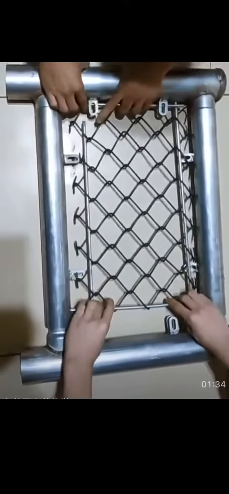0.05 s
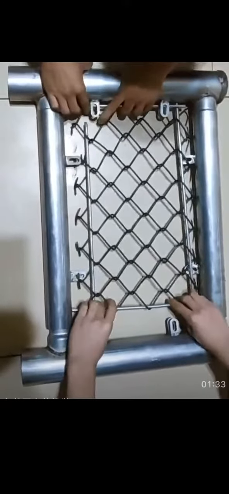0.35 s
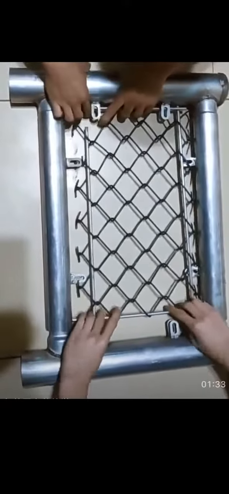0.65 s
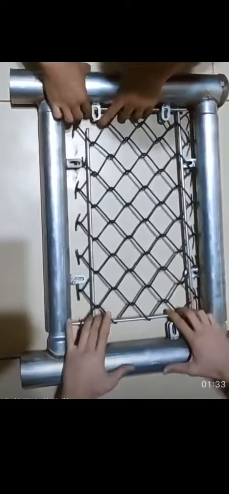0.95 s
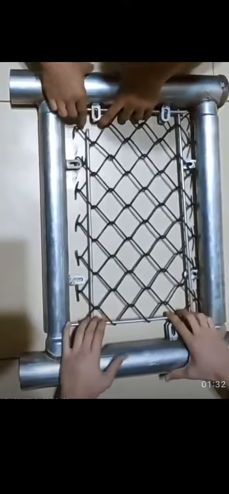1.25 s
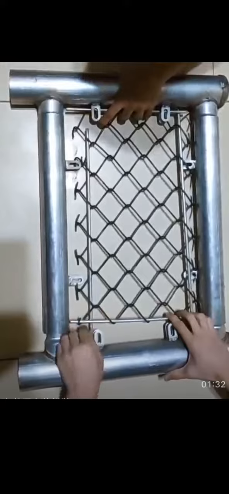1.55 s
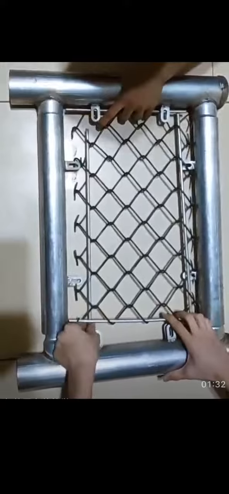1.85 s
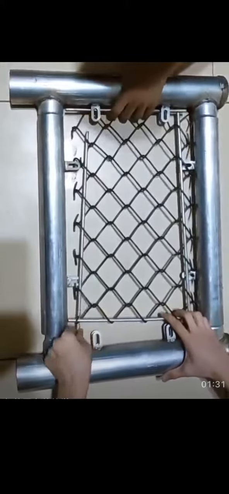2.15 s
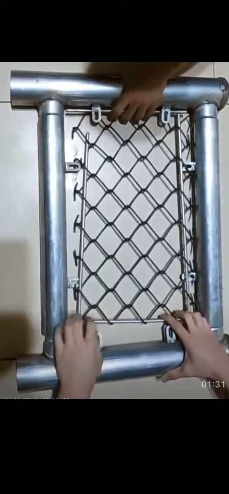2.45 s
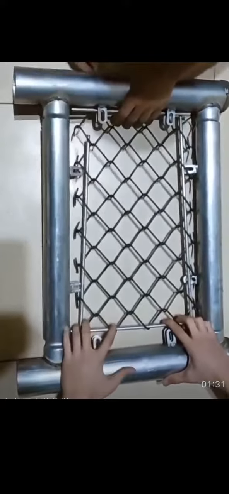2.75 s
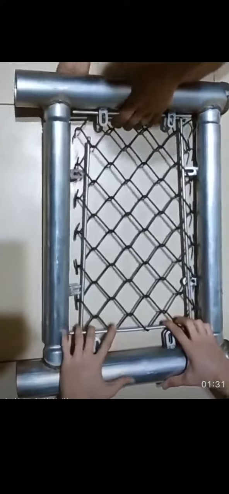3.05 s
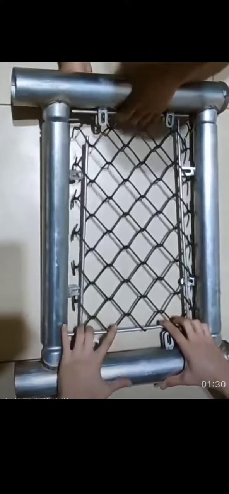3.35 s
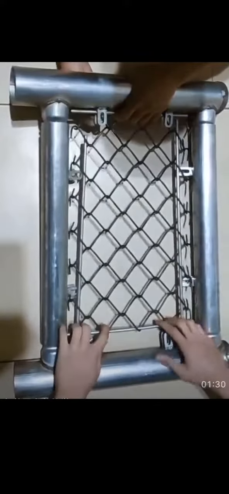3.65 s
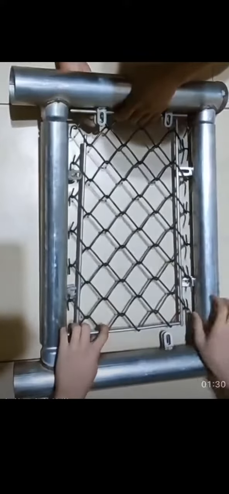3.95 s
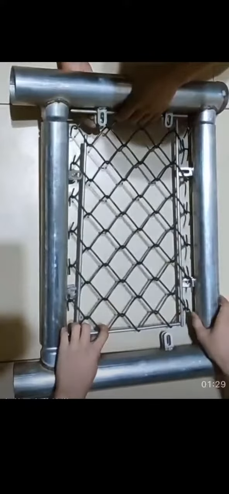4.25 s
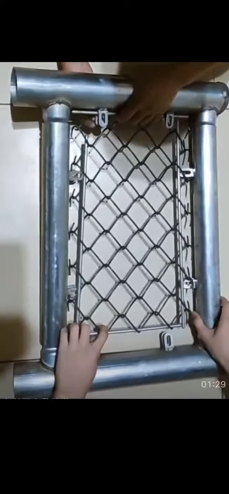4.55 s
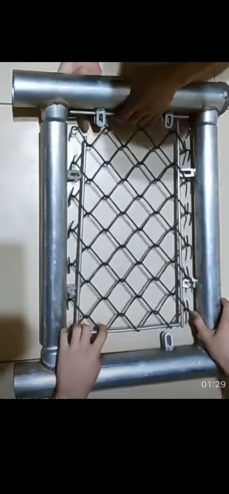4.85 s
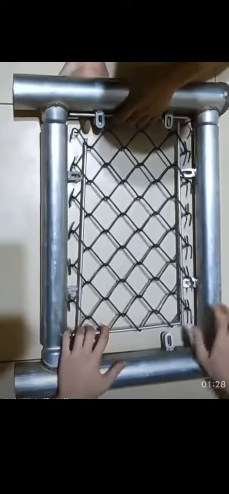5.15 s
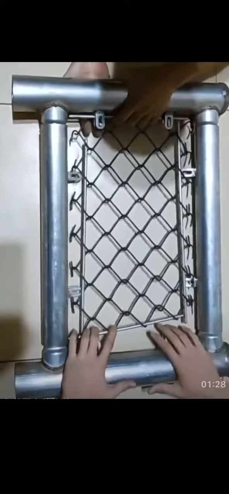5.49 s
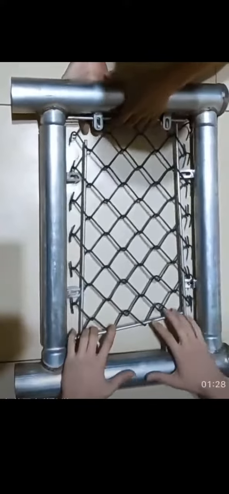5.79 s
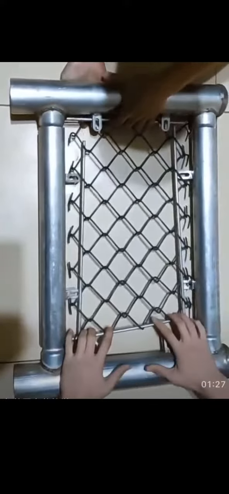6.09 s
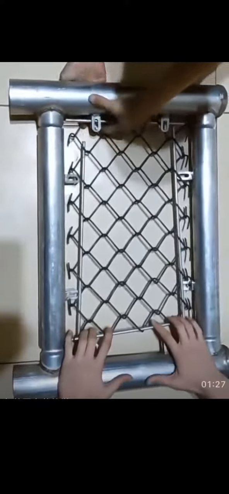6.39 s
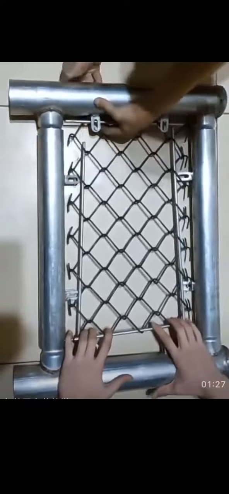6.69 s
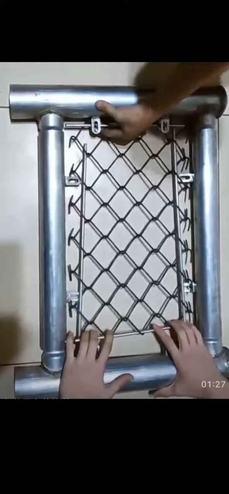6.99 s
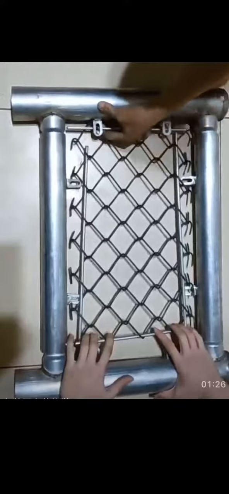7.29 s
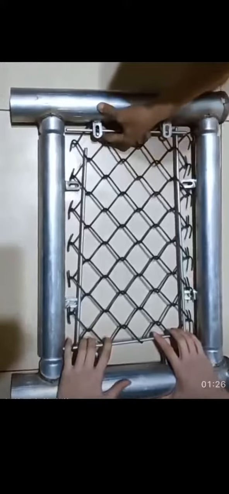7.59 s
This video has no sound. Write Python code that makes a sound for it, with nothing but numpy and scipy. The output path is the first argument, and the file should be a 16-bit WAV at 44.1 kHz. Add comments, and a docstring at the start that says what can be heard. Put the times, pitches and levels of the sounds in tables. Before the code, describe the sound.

Chain-link mesh rustles against a steel pipe frame, with irregular metallic clinks, a sharp snap and a ringing bump in a small room.

```python
"""A small hard room with a tiled floor; one microphone, close to a welded frame of steel pipe.
Over a low hush, hands settle a panel of chain-link mesh into the frame: wire rustles, clamps chatter.
At 2 s a rod squeaks in its clamps, then knocks and, at 3.5 s, slides. From 5 s the mesh is pulled taut
until a bar snaps against the pipe. Near 7 s the mesh drags, and the whole frame bumps the floor,
rings and comes to rest. Tiles and walls answer every knock."""
import sys
import numpy as np
from scipy import signal
from scipy.fft import rfft, irfft
from scipy.io import wavfile
from scipy.ndimage import uniform_filter1d

SR = 44100
rng = np.random.default_rng(int(sys.argv[2]) if len(sys.argv) > 2 else 0)


def transcribe(signal):
    """Save signal, clipped to [-1, 1], as a 16-bit WAV file at the path in sys.argv[1]."""
    frames = np.atleast_2d(signal).T
    limited = np.clip(frames, -1, 1)
    pcm = np.round(limited * 32767).astype(np.int16)
    wavfile.write(sys.argv[1], SR, pcm)


N = 345303


def amp(db):
    """Decibels to gain."""
    return 10 ** (np.asarray(db) / 20)


def unit(x):
    """Scale to rms 1."""
    return x / np.sqrt(np.mean(x ** 2) + 1e-20)


def read(points, hz):
    """Interpolate a table on a log-frequency axis."""
    f, value = np.transpose(points)
    return np.interp(np.log(hz + 1), np.log(f + 1), value)


def add(mix, start_s, sound):
    """Mix a sound in at its start time."""
    part = mix[max(round(start_s * SR), 0):][:len(sound)]
    part += sound[:len(part)]


def colour(x, *spectra, size=4096):
    """Causal filter with the summed dB of the spectra."""
    hz = abs(np.fft.fftfreq(size, 1 / SR))
    log_gain = np.log(amp(sum(read(s, hz) for s in spectra)))
    taps = np.fft.ifft(np.exp(np.conj(signal.hilbert(log_gain)))).real
    return signal.oaconvolve(x, taps[:size // 2])[:len(x)]


def level_out(x, count=16):
    """Flatten a burst's spectrum over broad bands, keeping its fine lines."""
    hz, power = np.fft.rfftfreq(len(x), 1 / SR), abs(rfft(x)) ** 2
    centres = np.geomspace(100, 13000, count)
    bands = [(f, -10 * np.log10(power[abs(hz - f) < 70 + f / 5].mean())) for f in centres]
    return colour(x, bands)


def grit(count, per_s, spread_db, smooth):
    """Micro-impacts of uneven size over a share of smooth friction."""
    size = amp(spread_db * np.minimum(rng.exponential(1, count), 4))
    hits = size * rng.choice([-1, 1], count) * (rng.random(count) < per_s / SR)
    return unit(unit(hits) + smooth * rng.standard_normal(count))


def strokes(rows, attack_s, release_s):
    """Gain of hand movements: each swells up to its listed time, holds and dies away."""
    t = np.arange(N) / SR
    gains = []
    for start, hold, db in rows:
        swell = np.minimum(t - start, 0) / attack_s
        fade = np.maximum(t - start - hold, 0) / release_s
        gains.append(amp(db) * np.exp(swell - fade))
    return np.max(gains, axis=0)


# Room tone all around the microphone: (frequency [Hz], relative level [dB])
HUSH_SPECTRUM = [(12, -20), (20, 3), (140, -19), (310, -16), (1890, -36.5), (2700, -34), (4190, -35),
                 (5510, -36.5), (5990, -36.5), (7250, -36), (14000, -52)]
def room_tone(hush_db=-65, hum_hz=101, hum_db=-79.5):
    """The steady low hush of the room with a faint mains hum."""
    spectrum = amp(read(HUSH_SPECTRUM, np.fft.rfftfreq(N, 1 / SR)))
    hush = irfft(rfft(rng.standard_normal(N)) * spectrum, N)
    hum = np.sin(2 * np.pi * hum_hz * np.arange(N) / SR)
    return amp(hush_db) * unit(hush) + amp(hum_db) * unit(hum)


# Decay of the small tiled room: (frequency [Hz], t60 [s])
ROOM_DECAY = [(120, 0.74), (400, 0.45), (1500, 0.37), (4000, 0.34), (8000, 0.31), (14000, 0.2)]
def reflections(x, wet_db=-9.0, build_s=0.0071):
    """Dense echoes reach the microphone from tiles and walls, each band dying at its own speed."""
    echoes = rng.choice([-1., 1.], SR) * (rng.random(SR) < 4000 / SR)
    hz, t, bands = signal.stft(echoes, SR, nperseg=256)
    decay = amp(-60 * t / read(ROOM_DECAY, hz)[:, None])
    tail = signal.istft(bands * decay, SR, nperseg=256)[1]
    tail *= 1 - np.exp(-(np.arange(len(tail)) / SR / build_s) ** 2)
    return amp(wet_db) * signal.fftconvolve(x, tail / np.linalg.norm(tail))[:N]


def ring_fittings(hits, ring_db=0, t60=0.071, uneven_db=3, count=110):
    """Hits plus the crowded, brief modes of clamps and wire, which differ with every spot touched."""
    t = np.arange(SR // 10) / SR
    detune, size, phase = rng.standard_normal((3, count, 1))
    hz = 12000 * ((np.arange(count)[:, None] + 2 + .4 * detune) / count) ** 1.4
    modes = amp(uneven_db * size) * hz ** (1 / 7) * np.sin(2 * np.pi * (hz * t + phase))
    ringing = modes.sum(0) * amp(-60 * t / t60)
    ringing /= np.linalg.norm(ringing)
    return hits + amp(ring_db) * signal.oaconvolve(hits, ringing)[:len(hits)]


# Colour of the steelwork, shared by rustle, drag and knocks: (frequency [Hz], level [dB])
STEEL_COLOUR = [(50, -21.5), (170, -3), (390, 0), (750, -3), (1250, -3.5), (1580, 5.5), (1800, -4.5),
                (2030, -6), (2400, -0.5), (2750, 1), (3800, -4), (4170, -5), (4500, -0.5), (5300, 0.5),
                (6000, -9.5), (7000, -3), (8500, -4), (9500, -18), (14000, -32)]
# Hands shift the mesh: (time [s], hold [s], relative level [dB])
MESH_SHIFTS = [(0, 0.3, -63.5), (.75, 0.86, -66), (2.03, 0.31, -60), (2.69, 0.74, -55.5), (3.4, 0.6, -59),
               (4.48, 0.031, -56.5), (4.99, 0.67, -57), (5.48, 0.42, -54), (6.8, 0.15, -52.5)]
def mesh_rustle(gain_db=-3, rest_db=-76, clump_db=1.5):
    """Wire links tick and rub against each other in clumps, each tick ringing briefly."""
    clumps = unit(uniform_filter1d(rng.standard_normal(N), size=1500))
    ticks = grit(N, per_s=400, spread_db=3, smooth=0.7) * amp(clump_db * clumps)
    wire_colour = [(150, 7.5), (400, -1.5), (1100, 1.5), (1600, 0), (3000, -1.5), (5000, -5),
                   (9000, -6.5)]
    wire = colour(ring_fittings(ticks), STEEL_COLOUR, wire_colour)
    movement = strokes(MESH_SHIFTS, attack_s=0.024, release_s=0.14)
    return (amp(rest_db) + amp(gain_db) * movement) * unit(wire)


# The mesh drags as the frame shifts: (time [s], hold [s], level [dB])
MESH_DRAGS = [(6.69, 0.27, -56.5)]
def mesh_drag():
    """Wire dragged over galvanised pipe hisses in fine, bright grains."""
    grains = grit(N, per_s=980, spread_db=-0.5, smooth=0.43)
    hiss = colour(grains, STEEL_COLOUR, [(1000, -1), (3000, -7), (5000, -1.5), (8000, 1), (13000, 5)])
    return strokes(MESH_DRAGS, attack_s=0.05, release_s=.015) * unit(hiss)


# Resonances of the sliding rod: (frequency [Hz], width [Hz], level [dB])
ROD_RESONANCES = [(1475, 80, -5), (1620, 30, 4.5), (1681, 21, 4), (3200, 900, -11.5), (3655, 43, -1),
                  (4790, 320, -3), (4980, 460, -4.5), (5280, 350, -2.5), (6900, 780, -11)]
# Pushes of the rod along the pipe: (time [s], hold [s], level [dB])
ROD_PUSHES = [(3.46, .008, -38.5), (3.51, 0.041, -40), (3.648, 0.034, -40), (3.72, 0.21, -58.5)]
def rod_slide():
    """Friction grains ring the rod's resonances."""
    hz = np.fft.rfftfreq(N, 1 / SR)
    body = sum(amp(db) / (1 + 2j * (hz - f) / width) ** 2 for f, width, db in ROD_RESONANCES)
    grains = ring_fittings(grit(N, per_s=700, spread_db=7.0, smooth=0.43))
    rubbed = unit(irfft(rfft(grains) * body, N))
    return strokes(ROD_PUSHES, attack_s=0.0041, release_s=0.017) * rubbed


# The rod catches in a clamp: (time [s], hold [s], level [dB])
ROD_CATCHES = [(2.051, 0.022, -41.5), (2.09, 0.041, -51), (2.132, 0.017, -44)]
# The rod slips free: (time [s], hold [s], level [dB])
ROD_SLIPS = [(2.08, 0.021, -36.5), (2.132, .012, -37.5), (2.207, 0.0089, -45.5)]
# Partials of its whistle: (frequency [Hz], relative level [dB])
WHISTLE_PARTIALS = [(8015, 5), (8160, -7), (10300, -13), (10810, -17)]
def rod_squeak(waver=0.00136):
    """The rod gives a dry rasp as it catches and a thin, beating whistle each time it slips."""
    whistle = 0
    for hz, db in WHISTLE_PARTIALS:
        drift = unit(uniform_filter1d(rng.standard_normal(N), size=300))
        whistle += amp(db) * np.sin(2 * np.pi * np.cumsum(hz * (1 + waver * drift)) / SR)
    rasp_colour = [(2000, -23), (6300, -10), (8000, 6.5), (9300, -9), (10800, -0.5), (11800, -28),
                   (14000, -13)]
    rasp = colour(grit(N, per_s=4400, spread_db=4, smooth=.9), rasp_colour)
    slipping = strokes(ROD_SLIPS, attack_s=0.0053, release_s=0.019)
    catching = strokes(ROD_CATCHES, attack_s=0.0009, release_s=.008)
    return slipping * unit(whistle) + catching * unit(rasp)


# Modes of the pipe frame lying on the tiles: (frequency [Hz], relative level [dB], t60 [s])
FRAME_MODES = [(194.7, -22.5, 0.22), (314.2, -22.5, 0.28), (391, -19, 0.51), (947, -21, 0.8),
               (1061.5, -15.5, 0.21), (1117, -15, 0.44), (1415, -9.5, 0.22), (1593, -12, .32),
               (1646, -6, 0.29), (1688, -13.5, 0.68), (2430, -15.5, 0.72), (2550, -15, 0.34),
               (2804, -15.5, 0.25), (2965, -15, 0.37), (3500, -23, 0.35), (3370, -23, 0.27),
               (3915, -22, 0.32), (4440, -15, 0.34), (5180, -22, 0.21)]
def frame_ring(force, blow, body_db, gain_db=-2.0, heavy_slope=0.43):
    """The frame gathers energy for as long as the chatter lasts, then rings on."""
    t = np.arange(len(force)) / SR
    modes = np.array([amp(-60 * t / t60) * np.sin(2 * np.pi * hz * t) for hz, _, t60 in FRAME_MODES])
    modes /= np.linalg.norm(modes, axis=1, keepdims=True)
    hz, mode_db, _ = np.transpose(FRAME_MODES)
    # light touches stay in the clamps; heavy blows reach the whole frame
    reach = amp(mode_db + read(blow, hz) + gain_db + heavy_slope * body_db)
    gathered = np.sqrt(np.cumsum(force ** 2) / np.sum(force ** 2))
    return gathered * (reach @ modes)


# Where a blow's thud, body, clank, sparkle and top lie: (frequency [Hz])
BLOW_BANDS = [400, 1300, 4000, 8000, 12000]
# The parts that get touched, by name: (note [Hz], extra thud [dB], extra sparkle [dB])
TOUCHED_PARTS = {"clamp": (2700, -1.1, -9.5), "wire": (4480, 9, -2.4), "rod tip": (5080, -2.7, -7),
                 "rod shaft": (1640, -20.5, -9.5), "clip": (8100, -2, 0.92), "bar": (3375, 0, -3),
                 "pipe": (1500, 0.5, -1.5), "palm": (395, 11.7, -8)}
# Knocks close to the microphone; hardness is clank over body, share is the note against the clack:
# (time [s], chatter [s], relative level [dB], hardness [dB], share [dB], part)
KNOCKS = [ (.252, 0.01, -31, 5, -12.5, "bar"), (0.423, 0.018, -44.5, -15, -20, "clamp"),
          (0.5, 0.012, -54, -26, -15, "clamp"), (0.602, 0.036, -37, -5.5, -21, "clamp"),
          (0.653, 0.029, -40.5, -5, -5, "clamp"), (0.819, .016, -50.5, -22, -19, "clamp"),
          (.884, 0.013, -48, -12, -9, "clamp"), (.997, 0.036, -38.5, -6, -4, "clamp"),
          (1.06, 0.019, -33, 3.5, -16, "clamp"), (1.118, 0.02, -33.5, -1, -1.5, "rod tip"),
          (1.148, 0.031, -36, -2.5, -11, "rod tip"), (1.484, 0.019, -38, 3, -16, "clip"),
          (1.51, .022, -23.5, 0.5, -10.5, "pipe"), (1.851, 0.011, -71, -26, 15.5, "palm"),
          (2.156, 0.025, -28.5, -3, -7, "clamp"), (2.203, 0.033, -28, -6, -15, "clamp"),
          (2.365, 0.018, -33, -3, -2, "bar"), (2.454, 0.0031, -31, 7.5, -5, "clamp"),
          (2.635, 0.013, -43, 4, -5.5, "palm"), (2.73, 0.018, -24.5, 5, -14, "clip"),
          (2.784, 0.01, -22, -4, -5.5, "pipe"), (2.806, 0.022, -29.5, -14, 2, "pipe"),
          (3.0351, 0.0063, -21.5, 15, -15, "rod tip"), (3.046, .023, -24.5, 15.5, -29, "rod tip"),
          (3.108, 0.0077, -37.5, 10, 1.5, "bar"), (3.2203, 0.0094, -31, 26, -14, "rod tip"),
          (3.453, 0.0054, -40, 12, 8.5, "rod tip"), (3.458, 0.013, -37.5, 2, 10, "rod shaft"),
          (3.625, .011, -43, 15, 7.5, "rod tip"), (4.034, .018, -34, 3, -11, "clamp"),
          (4.062, .012, -36, 4.5, 1.5, "rod shaft"), (4.237, 0.0053, -45, -8, -14, "clamp"),
          (4.484, 0.0037, -22.5, 18, -4.5, "rod tip"), (4.568, 0.016, -41.5, -7.5, -2, "clamp"),
          (5.04, .015, -37.5, 10, -3.5, "wire"), (5.08, .0082, -39, 0.5, -2.5, "clip"),
          (5.179, .009, -45.5, -11, 3, "rod shaft"), (5.263, .017, -35.5, 16, -2.5, "wire"),
          (5.281, 0.017, -32.5, -1, -11, "clip"), (5.361, 0.033, -37.5, 0.5, -0.5, "wire"),
          (5.401, 0.049, -31.5, -5, -7, "clamp"), (5.5667, 0.0058, -13, 17.5, -2, "bar"),
          (5.891, 0.0077, -29.5, -11.5, -8.5, "clamp"), (5.902, 0.0075, -30.5, 9.5, -0.5, "wire"),
          (6.197, .005, -50, 13.5, -3, "clip"), (6.313, .0046, -38, 11.5, -0.5, "clamp"),
          (6.714, 0.016, -38.5, -6.5, -3.5, "wire"), (6.754, 0.0072, -33.5, -7.5, -17, "wire"),
          (6.898, 0.0062, -23, -17, -12, "pipe"), (6.906, 0.018, -10, -7, -25, "pipe"),
          (6.953, 0.016, -22, -16, -4, "pipe"), (7.256, .022, -43, -5.5, -8, "clamp"),
          (7.329, 0.0085, -60, -21.5, -3, "palm"), (7.509, 0.018, -52.5, 11, -1, "wire"),
          (7.52, 0.017, -62, -24.5, -3.5, "palm")]
def knock(chatter_s, level_db, hardness_db, share_db, part, gain_db=25, note_t60=0.053, size=16384):
    """Steel chatters on steel: a burst of tiny blows, the touched part's note and the frame's ring."""
    note_hz, thud_db, sparkle_db = TOUCHED_PARTS[part]
    body_db, clank_db = level_db - hardness_db / 2, level_db + hardness_db / 2
    # each part's treble tilt continues up to 12 kHz, so most knocks sound duller on top
    top_db = clank_db + 1.71 * sparkle_db
    blow = list(zip(BLOW_BANDS, [body_db + thud_db, body_db, clank_db, clank_db + sparkle_db, top_db]))
    t = np.arange(SR) / SR
    force = (1 - np.exp(-5 * t / chatter_s)) * np.exp(-t / chatter_s)
    chatter = force[:size] * grit(size, per_s=2000, spread_db=3.5, smooth=0.81)
    clack = colour(level_out(ring_fittings(chatter, ring_db=1)), STEEL_COLOUR, blow)
    # every tiny blow restarts the touched part, so its note is rough
    brief = t[:SR // 10]
    ping = amp(-60 * brief / note_t60) * np.sin(2 * np.pi * note_hz * brief)
    note = signal.oaconvolve(chatter, ping)[:size]
    note *= amp(share_db) * np.linalg.norm(clack) / np.linalg.norm(note)
    sound = frame_ring(force, blow, body_db)
    add(sound, 0, clack + note)
    return amp(gain_db) * sound


def scene():
    """At the microphone, in mono: the steelwork close by, the room behind it."""
    steel = rod_squeak() + rod_slide() + mesh_rustle() + mesh_drag()
    for start_s, *touch in KNOCKS:
        add(steel, start_s, knock(*touch))
    return (steel + reflections(steel) + room_tone())[None]


def record(dry, edge_hz=14300):
    """The recorder's band limit."""
    lowpass = signal.firwin(511, edge_hz, window=("kaiser", 9), fs=SR)
    return signal.oaconvolve(dry, lowpass[None], "same")


dry = scene()
out = record(dry)
transcribe(out)
```